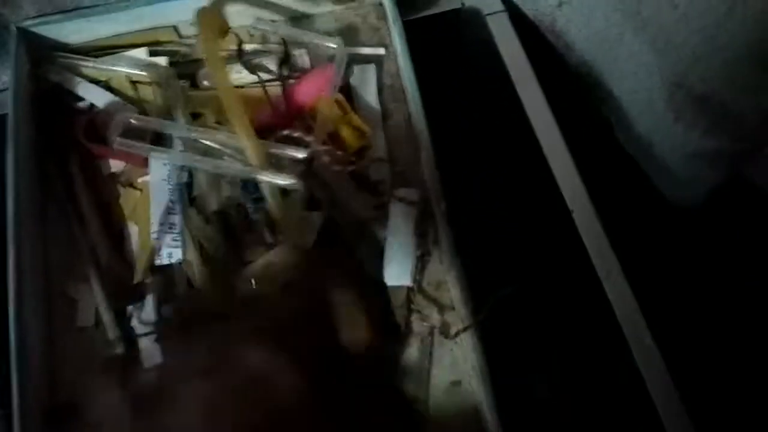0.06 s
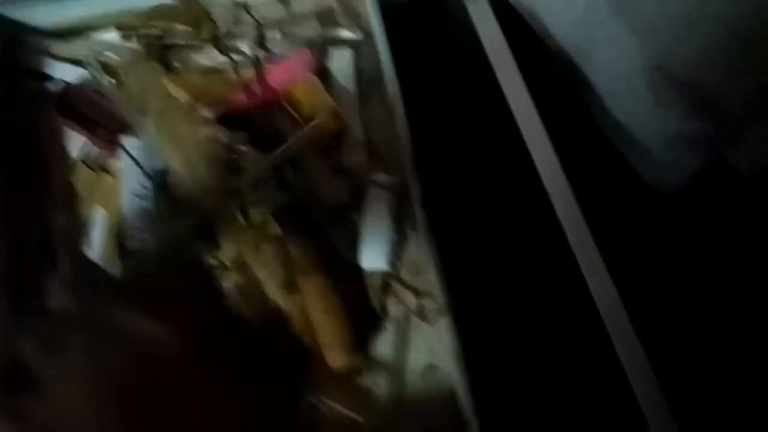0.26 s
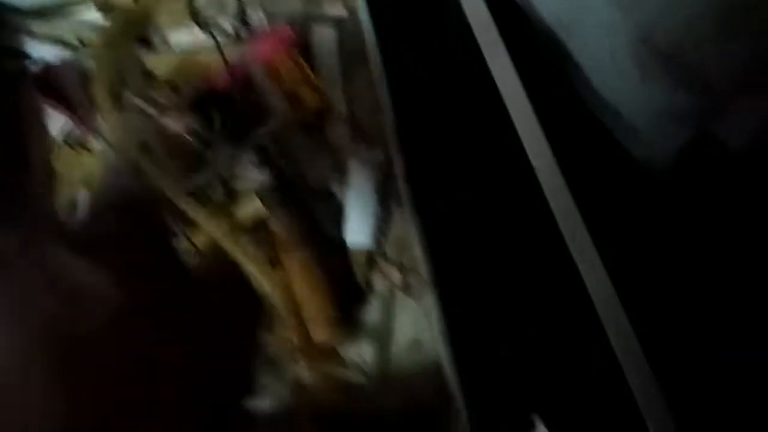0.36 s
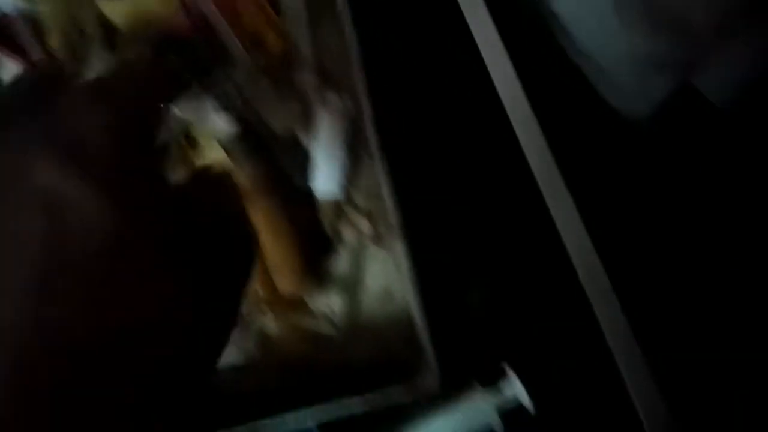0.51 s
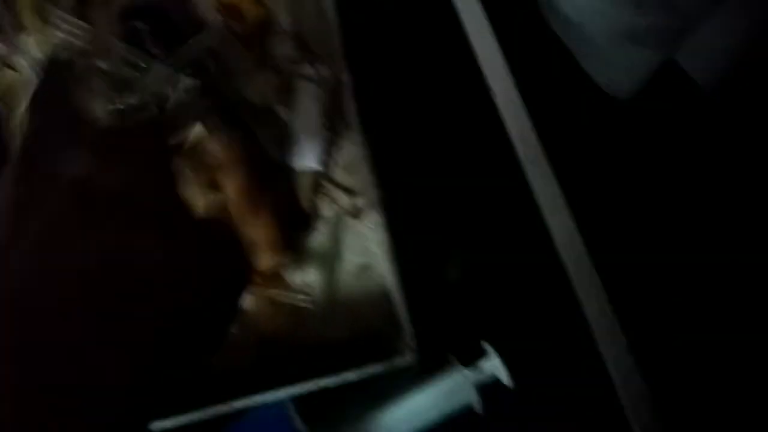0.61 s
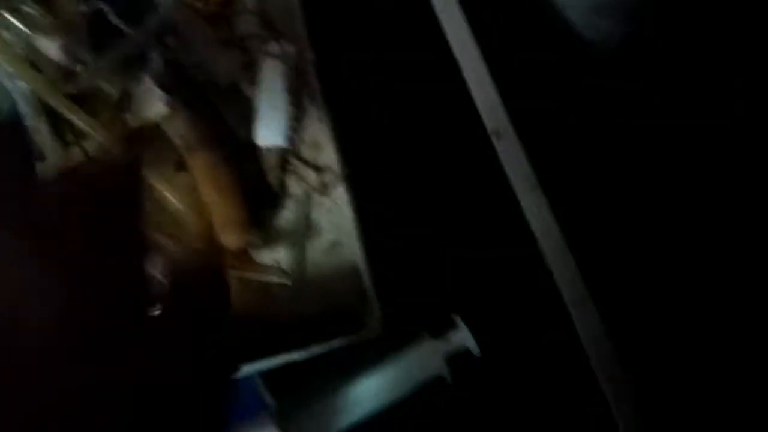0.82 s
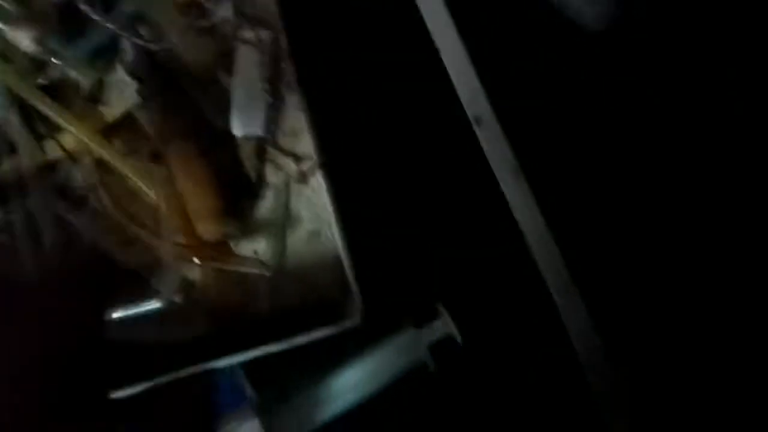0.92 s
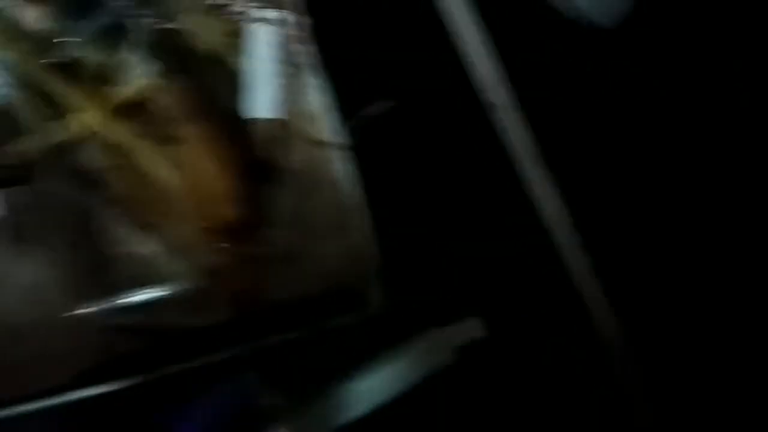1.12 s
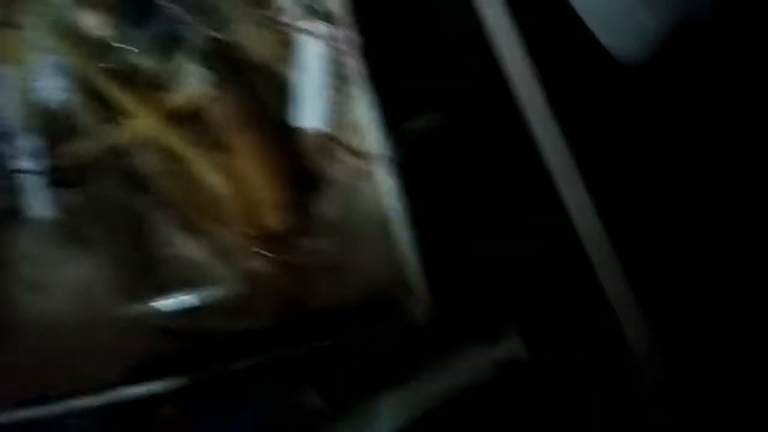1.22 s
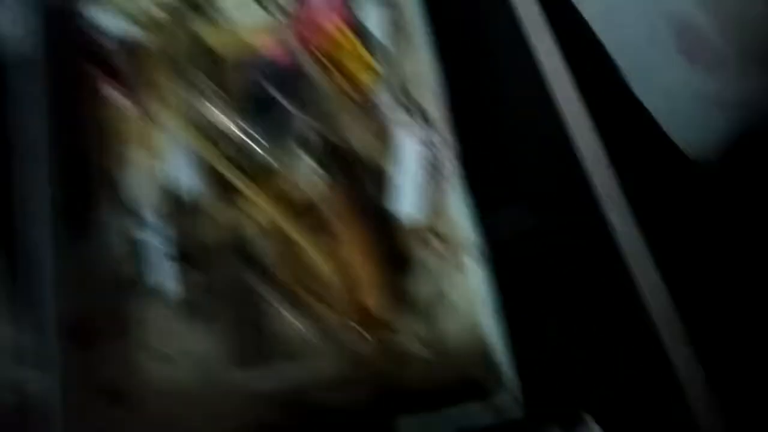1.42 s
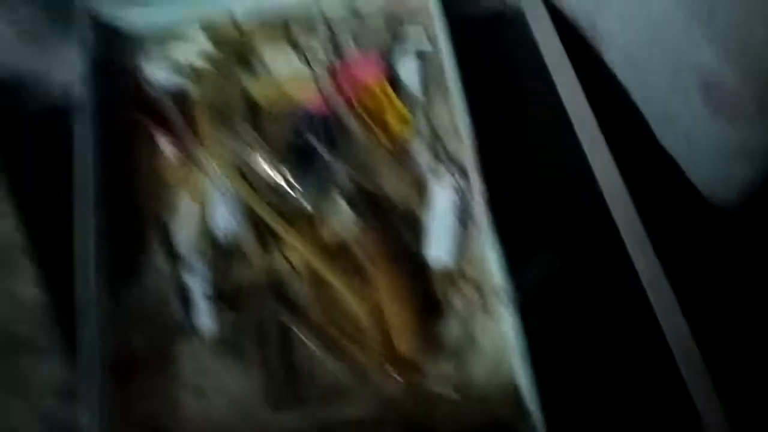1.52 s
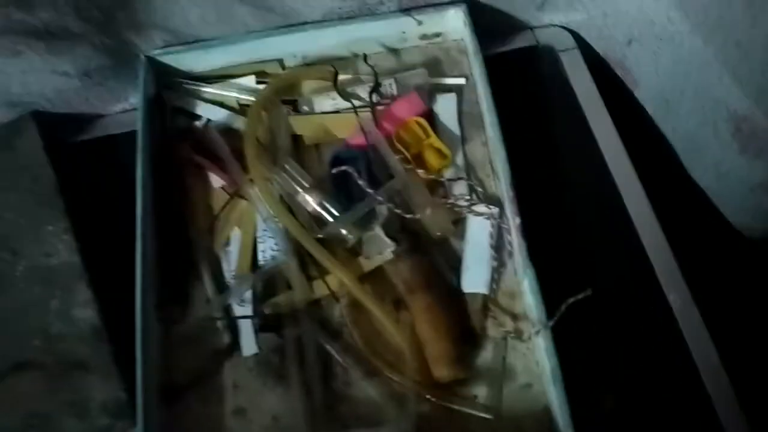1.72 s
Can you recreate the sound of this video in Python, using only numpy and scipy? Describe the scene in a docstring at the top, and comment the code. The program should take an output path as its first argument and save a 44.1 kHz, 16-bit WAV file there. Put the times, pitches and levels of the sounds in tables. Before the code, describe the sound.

Rummaging in a box of glass tubes, close-miked in a quiet room. Almost still at first; from 0.17 to 0.5 seconds glass ticks, slides and clinks brightly, strongest near 0.4, with dull box knocks. Lighter clinks follow at 0.7 to 0.8. After a lull, plastic snaps from 1.07, sharpest at 1.23; a glassy ping at 1.48 starts a light, skipping rattle with scraping until about 1.75. Faint low hum throughout.

```python
"""Rummaging in a box of glass tubes

A hand rummages through a box of glass tubes and small plastic items, close by in a quiet room.
Three tubes clink and ring as sums of fading tones; loose glass ticks and pings, and sliding glass chatters.
Plastic snaps, scrapes and rattles, and the box takes dull knocks: short bursts of filtered noise.
A low hum made of steady tones and a faint noise of room air lie under it all."""
import sys
import numpy as np
from scipy import signal
from scipy.fft import rfft, irfft
from scipy.io import wavfile

SR = 44100
rng = np.random.default_rng(int(sys.argv[2]) if len(sys.argv) > 2 else 0)


def pcm_store(signal):
    """Save signal as 16-bit PCM."""
    levels = np.round(np.clip(np.atleast_2d(signal), -1, 1) * 32767)
    wavfile.write(sys.argv[1], SR, levels.astype(np.int16).T)


N = 77175  # length in samples
TOP_HZ = 15800  # upper edge of the sound

# Tone colour of a hard, bright contact. Each row: frequency in Hz, level in dB.
CONTACT = [(300, -42.5), (1000, -32.5), (1600, -16), (2800, -11), (5000, -5), (7000, 0), (9000, 5),
           (10500, -3), (12000, -9), (14500, 3.5), (16500, 0.5)]
# Tone colour of glass rubbing or ticking on glass. Each row: frequency in Hz, level in dB.
GLASS_GRIT = [(220, -18), (370, 2), (900, -14), (2000, -4), (2800, -11), (5000, -4.5), (7200, 0),
              (10000, -1), (14000, -2.5), (16000, -5.5)]


def undb(db):
    """Turn decibels into a gain."""
    return 10 ** (np.asarray(db) / 20)


def unit(x):
    """Scale to an average (rms) level of 1."""
    return x / np.sqrt(np.mean(x ** 2))


def fade(t60):
    """A smooth exponential decay that falls by 60 dB in t60 seconds."""
    return np.exp(-np.log(1000) * np.arange(N) / SR / max(t60, 1e-4))


def noise():
    """White noise: all frequencies equally strong."""
    return rng.standard_normal(N)


def colour(x, points):
    """Filter through (Hz, dB) points without sounding ahead of the input; white noise keeps its power."""
    hz, db = np.array(points, float).T
    size = 4096
    grid = np.fft.rfftfreq(size, 1 / SR)
    gain = unit(undb(np.interp(np.log(grid + 1), np.log(hz), db)))
    # Folding the cepstrum gives a minimum-phase filter, which responds as early as it can.
    cepstrum = irfft(np.log(gain))
    cepstrum[1:size // 2] *= 2
    cepstrum[size // 2 + 1:] = 0
    response = irfft(np.exp(rfft(cepstrum)))
    return signal.fftconvolve(x, response)[:N]


def body(resonances, order=1):
    """Add up (Hz, width Hz, dB) resonances into (Hz, dB) points; a higher order has steeper skirts."""
    hz = np.geomspace(100, 18000, 400)
    power = 0
    for f, width, db in resonances:
        distance = (hz / f - f / hz) * f / width
        power = power + undb(db) ** 2 / (1 + distance ** 2) ** order
    return np.c_[hz, 10 * np.log10(power)]


def blows(rows, t60, tail_db=-100, tail_t60=.01):
    """A burst of tiny contacts for each (s, dB): a main crack and a weaker tail."""
    attack_s = 0.0006
    hits = np.zeros(N)
    for s, db in rows:
        hits[int(np.clip(s * SR, 0, N - 1))] += undb(db) ** 2
    decay = fade(t60) ** 2 + (undb(tail_db) * fade(tail_t60)) ** 2
    shape = decay * (1 - fade(attack_s)) ** 2
    power = signal.fftconvolve(hits, shape)[:N]
    return np.sign(noise()) * np.sqrt(np.maximum(power, 0))


def ring(rows, modes, scatter_db=1, detune=0):
    """Strike fading (Hz, dB, t60) tones at each (s, dB); the point of contact varies their strengths."""
    out = np.zeros(N)
    t = np.arange(SR // 3) / SR
    for s, strike_db in rows:
        start = int(np.clip(s * SR, 0, N - 1))
        tone = np.zeros(len(t))
        for hz, mode_db, t60 in modes:
            level_chance, pitch_chance, sign_chance = rng.standard_normal(3)
            level = np.sign(sign_chance) * undb(strike_db + mode_db + scatter_db * level_chance)
            pitch = hz * (1 + detune * pitch_chance)
            tone += level * np.sin(2 * np.pi * pitch * t) * fade(t60)[:len(t)]
        out[start:start + len(t)] += tone[:N - start]
    return out


def slips(rate):
    """Uneven little impulses of surfaces that catch and let go, about rate per second."""
    spread_db = 3
    happens = rng.random(N) < rate / SR
    strength = undb(spread_db * np.minimum(rng.exponential(size=N), 3))
    return unit(happens * np.sign(noise()) * strength)


def grit(rate):
    """Each slip makes a short dry grain of noise."""
    grain_t60_s = 0.012
    power = signal.fftconvolve(slips(rate) ** 2, fade(grain_t60_s) ** 2)[:N]
    return unit(noise() * np.sqrt(np.abs(power)))


def effort(curve):
    """Gain that follows an (s, dB) curve."""
    return undb(np.interp(np.arange(N) / SR, *np.array(curve).T))


def tubes():
    """Each clink is a hard contact that sets the three glass tubes ringing."""
    # Glass hitting glass. Each row: start in seconds, then levels in dB of the contact and tubes A, B and C.
    clinks = [(0.2987, -68, -57, -24, -48), (0.3495, -23, -36.5, -27, -50), (0.3942, -26, -37, -35, -33),
              (.397, -15, -14.5, -37.5, -23.5), (0.4797, -36.5, -48, -58, -39),
              (0.6843, -35.5, -62, -59, -49.5), (0.7312, -27.5, -67, -42, -34), (.817, -33, -50, -58, -31)]
    # Pitches of each tube's ringing tones, in Hz.
    a_hz = [5819, 6331, 7395, 8237, 8900, 9231, 10640, 11720, 11980, 14397, 15452]
    b_hz = [2020, 3859, 7420, 9007, 9590, 12540, 13631, 14126, 14420, 15123]
    c_hz = [3725, 5822, 7095, 7480, 8245, 10065, 13480, 13650, 15115]
    # Ring of each tone, in the same order. Each row: level in dB, time to fall 60 dB in seconds.
    a_ring = [(-35, 0.31), (-15, 0.062), (-19, 0.07), (-4, .085), (-3.5, 0.025), (-11.5, .065), (-3, .045),
              (-12.5, .04), (10, .018), (-8, 0.14), (-12, 0.077)]
    b_ring = [(-27.5, 0.16), (-17.5, 0.056), (-13, .08), (2.5, 0.1), (-12.5, .07), (-12.5, 0.094),
              (-8, .08), (-2, .07), (-11, 0.06), (-8.5, 0.083)]
    c_ring = [(-10.5, 0.027), (-16, 0.055), (-4.5, 0.038), (-8, 0.0373), (0.5, 0.058), (-3, 0.046),
              (-5.5, 0.05), (-7.5, 0.027), (-17, .07)]

    s, contact, *strengths = np.array(clinks).T
    bursts = blows(zip(s, contact), t60=0.031, tail_db=-17, tail_t60=0.036)
    out = colour(bursts, CONTACT)
    glasses = np.c_[a_hz, a_ring], np.c_[b_hz, b_ring], np.c_[c_hz, c_ring]
    for db, modes in zip(strengths, glasses):
        out = out + ring(zip(s, db), modes)
    return out


def loose_glass():
    """Small pieces tick together, damped by the pile; some ping on a single note."""
    # Small touches of glass. Each row: start in seconds, level in dB.
    ticks = [(.008, -54), (.035, -54), (.0707, -45.5), (.108, -56), (.1795, -32.5), (.1865, -34),
             (.1925, -40), (.2005, -42), (.2092, -31), (.217, -33.5), (.2345, -33.5), (.2387, -28),
             (.2565, -31), (.282, -31.5), (.2905, -30), (.3295, -41.5), (.338, -38), (.6535, -57.5)]
    # Ring of a tick. Each row: frequency in Hz, level in dB, time to fall 60 dB in seconds.
    tick_modes = [(2063, -24, 0.033), (3180, -15.5, 0.061), (5176, -6, 0.025), (7160, -0.5, 0.035),
                  (7450, -6.5, .03), (8626, -3.5, .025), (10130, -2.5, 0.053), (11400, -1, .04),
                  (13540, -2.5, 0.016)]
    # Pieces that ring on one note. Each row: start in seconds, pitch in Hz, level in dB.
    pings = [(.035, 3830, -59.5), (.187, 3180, -40), (.188, 7270, -36), (.2095, 4900, -33.5),
             (.211, 2070, -42.5), (.247, 3890, -42.5), (.285, 3840, -37.5), (.286, 2067, -35.5),
             (.338, 1978, -43), (.373, 2014, -39), (1.421, 2620, -72.5), (1.4753, 4960, -36)]
    grit_db, ring_db = -8.5, -8
    tick_t60_s, ping_t60_s = .022, 0.042

    out = undb(grit_db) * colour(blows(ticks, tick_t60_s), GLASS_GRIT)
    out = out + undb(ring_db) * ring(ticks, tick_modes, scatter_db=6, detune=.02)
    for s, hz, db in pings:
        out = out + ring([(s, db)], [(hz, 0, ping_t60_s)])
    return out


def glass_slide(count=28, size=5):
    """Glass slides over glass: every slip pings one of several pieces, each with its own high tones."""
    # How strong the sliding is over time. Each row: time in seconds, level in dB.
    slide_curve = [(0, -49), (.012, -59), (.022, -66), (.038, -60.5), (.06, -91), (.15, -77.5),
                   (.165, -49.5), (.19, -36.5), (.228, -48.5), (.255, -34), (.275, -50.5), (.305, -38.5),
                   (.36, -44), (.388, -44.5), (.42, -36.5), (.46, -67.5), (.63, -101), (.67, -70),
                   (.695, -56.5), (.765, -53), (.795, -76.5), (.83, -50.5), (.87, -74.5), (1.06, -103)]
    slips_per_s = 450  # shared among all the pieces
    ring_t60_s, hiss_db = .032, -8
    t = np.arange(SR // 8) / SR
    force = effort(slide_curve)
    pings = 0
    for _ in range(count):
        hz = 1500 + (TOP_HZ - 1500) * rng.random(size)
        phase = rng.random((size, 1))
        tones = np.sin(2 * np.pi * (hz[:, None] * t + phase)).sum(axis=0)
        piece = tones * fade(ring_t60_s)[:len(t)]
        pushes = slips(slips_per_s / count) * force
        pings = pings + signal.fftconvolve(pushes, piece / np.linalg.norm(piece))[:N]
    hiss = undb(hiss_db) * force * grit(slips_per_s)
    return colour(pings / np.sqrt(count) + hiss, GLASS_GRIT)


def plastic():
    """Plastic snaps against plastic: short dry bursts with a hard edge."""
    # Snaps. Each row: start in seconds, level of the body in dB, level of the hard edge in dB.
    snaps = [(1.0715, -44, -78), (1.1144, -65, -42.5), (1.118, -64, -57), (1.1504, -43, -34),
             (1.153, -41, -31.5), (1.157, -41.5, -41), (1.2263, -20, -31.5), (1.2325, -40, -61),
             (1.239, -34.5, -50), (1.24, -50, -48), (1.493, -64, -29.5)]
    # Tone colour of the snapping body. Each row: frequency in Hz, level in dB.
    snap_colour = [(250, -55), (500, -17.5), (1500, -25.5), (3000, -9.5), (4700, -8.5), (5700, 6),
                   (7200, -6), (9000, 0), (11500, -9.5), (14000, -20), (16500, -18)]

    s, *levels = np.array(snaps).T
    out = 0
    for db, shape in zip(levels, (snap_colour, CONTACT)):
        bursts = blows(zip(s, db), t60=0.0068, tail_db=-11, tail_t60=0.029)
        out = out + colour(bursts, shape)
    return out


def skipping():
    """A light item skips over the others; it lands differently each time, which shifts its resonances."""
    # Landings. Each row: start in seconds, level in dB.
    landings = [(1.4751, -33), (1.477, -32.5), (1.5005, -39), (1.5155, -43.5), (1.527, -43), (1.541, -49),
                (1.5544, -43.5), (1.565, -44), (1.6024, -49), (1.67, -41.5), (1.684, -39.5), (1.696, -38.5),
                (1.702, -40), (1.7215, -41.5), (1.7307, -37), (1.7425, -34.5)]
    # Resonances of the item. Each row: frequency in Hz, width in Hz, level in dB.
    item_body = [(910, 240, -14), (1480, 127, 4.5), (2533, 80, 0), (3520, 530, -3.5), (4230, 75, 3),
                 (5200, 250, -4), (6300, 1100, -14), (8570, 120, 2), (9200, 220, 1.5), (12400, 1700, -18)]
    scatter_db, detune = 3, .025  # detune is a fraction of the frequency

    out = 0
    for landing in landings:
        shifted = []
        for hz, width, db in item_body:
            pitch_chance, level_chance = rng.standard_normal(2)
            shifted.append((hz * (1 + detune * pitch_chance), width, db + scatter_db * level_chance))
        burst = blows([landing], t60=0.019, tail_db=-11.5, tail_t60=0.1)
        out = out + colour(burst, body(shifted))
    return out


def plastic_slide():
    """Plastic scrapes in dry grains."""
    # How strong the scraping is over time. Each row: time in seconds, level in dB.
    scrape_curve = [(1.06, -99.5), (1.09, -63.5), (1.125, -55), (1.165, -63.5), (1.2, -75.5), (1.25, -63.5),
                    (1.35, -76), (1.385, -62), (1.41, -80.5), (1.465, -72), (1.49, -47), (1.57, -62.5),
                    (1.655, -66.5), (1.69, -57), (1.75, -46)]
    # Tone colour of the scraping. Each row: frequency in Hz, level in dB.
    scrape_colour = [(150, -18.5), (400, -11.5), (1400, 1.5), (2200, -0.5), (4000, -6), (6000, -3),
                     (8700, 2), (11000, -2), (16000, -2.5)]
    grains_per_s = 1900
    return colour(grit(grains_per_s) * effort(scrape_curve), scrape_colour)


def box():
    """Items clack on the box, its walls and floor answer lower down; soft bumps sound a few hollow notes."""
    # Knocks. Each row: start in seconds, then levels in dB of the clack, hollow wall and floor thump.
    knocks = [(0.124, -56, -82, -77), (0.181, -46.5, -59, -120), (0.2411, -31, -40, -79),
              (.248, -31, -53.5, -82), (0.26, -52, -45.5, -54), (0.284, -43.5, -60, -58.5),
              (0.318, -36, -56.5, -61), (0.399, -45, -49, -59.5), (0.419, -40.5, -53, -55.5),
              (0.688, -49, -60, -65.5), (0.7732, -43.5, -68, -74), (0.819, -50, -59.5, -69),
              (1.074, -57.5, -89, -88), (1.101, -55, -96, -66.5), (1.227, -39, -50.5, -91.5),
              (1.2373, -42.5, -45.5, -81), (1.557, -58, -57.5, -60.5)]
    # Tone colours of these three parts. Each row: frequency in Hz, level in dB.
    clack = [(300, -29.5), (1100, -21.5), (1600, 6.5), (2000, 3), (2380, 5), (2800, -5), (5000, -16),
             (16000, -41.5)]
    wall = [(120, -27.5), (260, -25), (350, -0.5), (520, -2), (800, 2), (2200, -6.5), (16000, -52)]
    thump = [(50, -20), (140, -2.5), (230, 4), (340, -6.5), (550, -20), (4000, -61)]
    # Soft bumps on a hollow item. Each row: start in seconds, level in dB.
    bumps = [(1.128, -53.5), (1.371, -56), (1.388, -66.5), (1.501, -43), (1.566, -55.5), (1.618, -57.5),
             (1.698, -47.5)]
    # Resonances of the hollow item. Each row: frequency in Hz, width in Hz, level in dB.
    hollow_body = [(840, 157, -1), (1412, 340, 1.5), (1860, 120, -16)]
    part_t60_s, bump_t60_s = (0.0253, 0.077, 0.076), 0.052

    s, *levels = np.array(knocks).T
    out = colour(blows(bumps, bump_t60_s), body(hollow_body, order=2))
    for db, t60, shape in zip(levels, part_t60_s, (clack, wall, thump)):
        out = out + colour(blows(zip(s, db), t60), shape)
    return out


def room(x):
    """Add quick reflections from the box and nearby things, and a much fainter tail, as fading noise."""
    # Tone colours of the reflections and of the tail. Each row: frequency in Hz, level in dB.
    early = [(100, -0.5), (500, 5.5), (2000, -2), (4000, 0.5), (6000, -7), (10000, -15.5), (16000, 3)]
    late = [(100, -11.5), (700, -2.5), (1500, -8.5), (4500, -11.5), (5700, 5.5), (7000, -2), (9000, -0.5),
            (12000, -3.5), (14000, 0.5), (16000, -7.5)]

    echo = 0
    for db, t60, shape in ((-10.5, 0.061, early), (-43.5, 0.075, late)):
        swell_and_fade = fade(t60) * (1 - fade(0.06))
        echo = echo + undb(db) * unit(colour(noise() * swell_and_fade, shape))
    return x + signal.fftconvolve(x, echo / np.sqrt(N))[:N]


def background():
    """A steady low hum of pure tones and faint room air made of filtered noise."""
    # Tones of the hum. Each row: frequency in Hz, level in dB.
    hum_tones = [(78.8, -69), (157, -78.5)]
    # Tone colour of the air. Each row: frequency in Hz, level in dB.
    air_colour = [(25, -22), (60, -0.5), (130, -1.5), (250, -12.5), (500, -25.5), (5000, -42.5)]
    air_db = -77

    t = np.arange(N) / SR
    hum = 0
    for hz, db in hum_tones:
        # The square root of 2 makes the level an rms level.
        hum = hum + np.sqrt(2) * undb(db) * np.sin(2 * np.pi * (hz * t + rng.random()))
    return hum + undb(air_db) * unit(colour(noise(), air_colour))


def scene():
    """Everything in the box, heard in the room over the background."""
    glass = tubes() + loose_glass() + glass_slide()
    other_items = plastic() + skipping() + plastic_slide() + box()
    return (room(glass + other_items) + background())[None]


def record(dry):
    """The recorder ducks while the sound is too loud, rounds peaks and cuts the rumble and the top."""
    limit_db, release_s = -17.5, 0.0098
    low_cut_hz, ceiling = 48, .7

    keep = np.exp(-1 / (SR * release_s))
    loudness = np.sqrt(signal.lfilter([1 - keep], [1, -keep], dry ** 2))
    ducked = dry / np.maximum(1, loudness / undb(limit_db))
    low_cut = signal.butter(2, low_cut_hz, "high", fs=SR, output="sos")
    held = signal.sosfilt(low_cut, ducked)
    rounded = ceiling * np.tanh(held / ceiling)
    top_cut = signal.ellip(8, .2, 70, TOP_HZ, fs=SR, output="sos")
    return signal.sosfilt(top_cut, rounded)


dry = scene()
out = record(dry)
pcm_store(out)
```